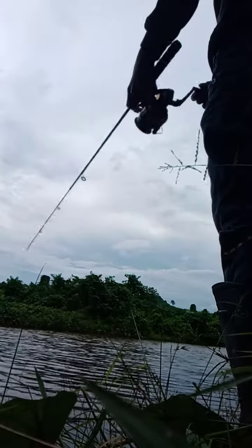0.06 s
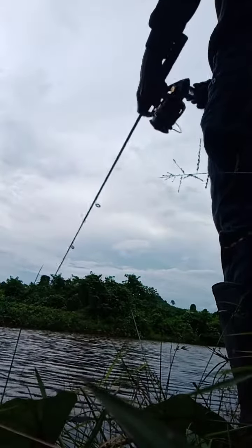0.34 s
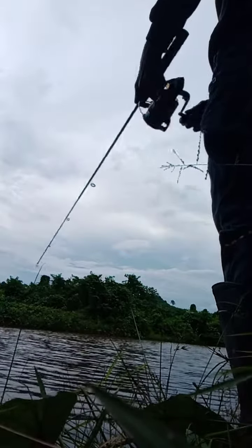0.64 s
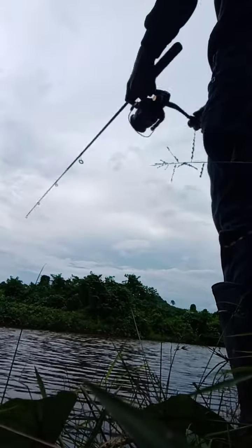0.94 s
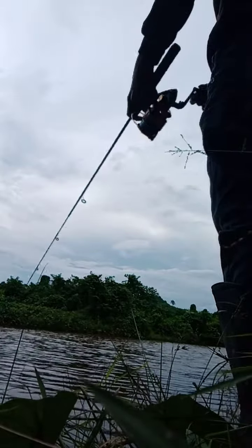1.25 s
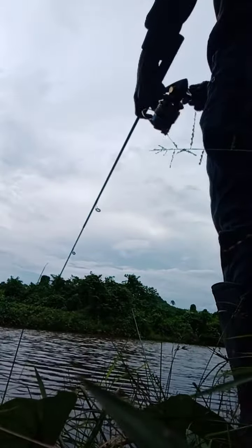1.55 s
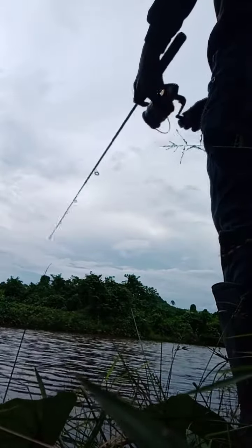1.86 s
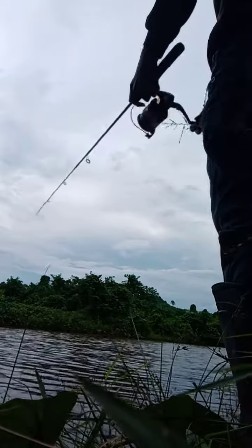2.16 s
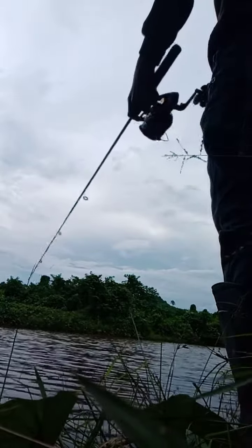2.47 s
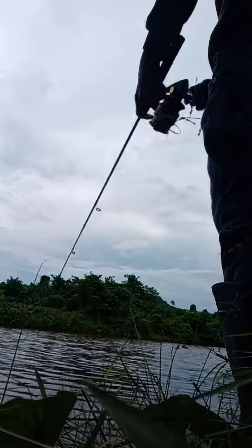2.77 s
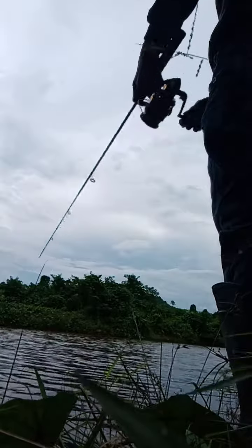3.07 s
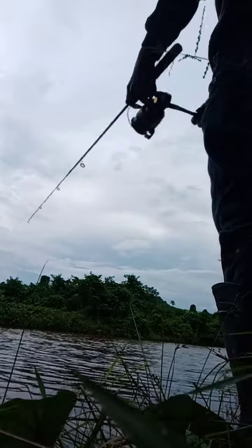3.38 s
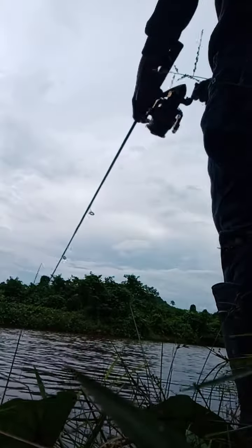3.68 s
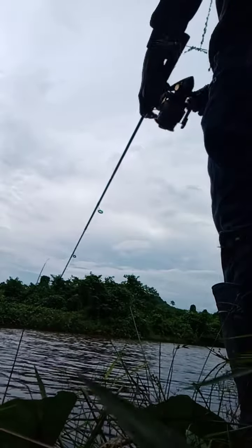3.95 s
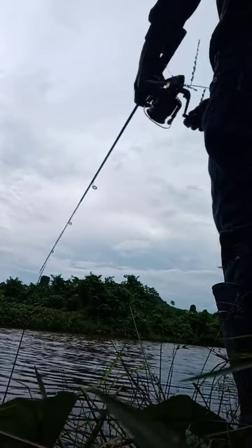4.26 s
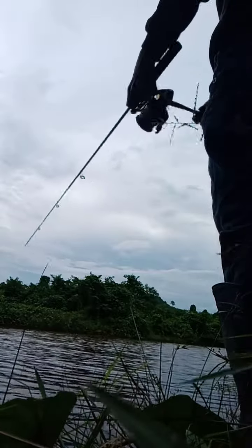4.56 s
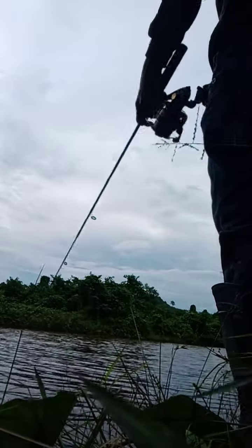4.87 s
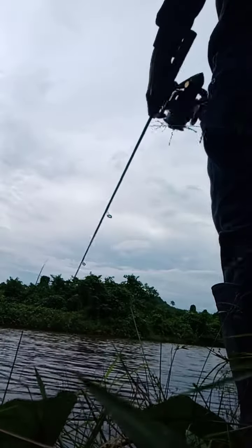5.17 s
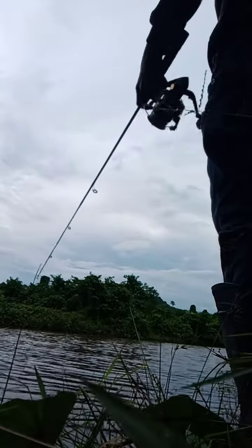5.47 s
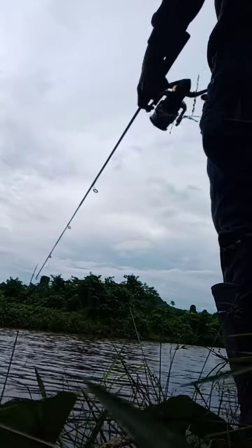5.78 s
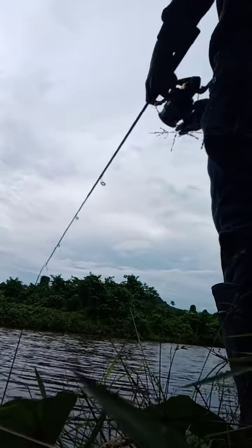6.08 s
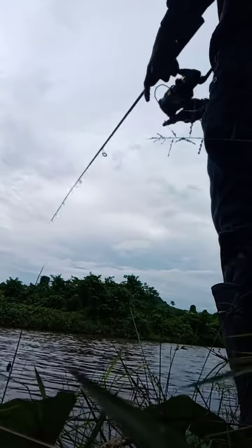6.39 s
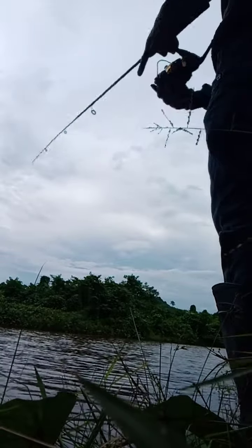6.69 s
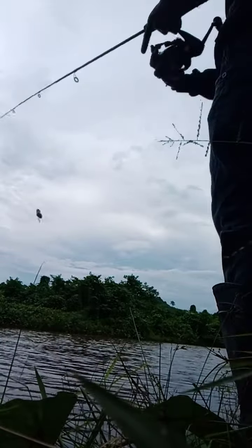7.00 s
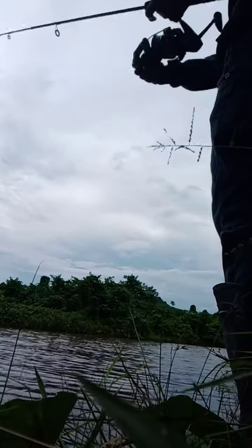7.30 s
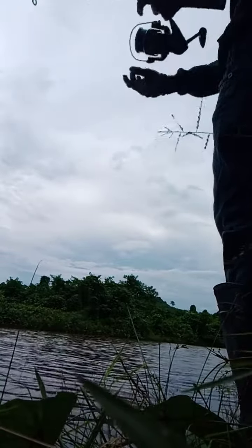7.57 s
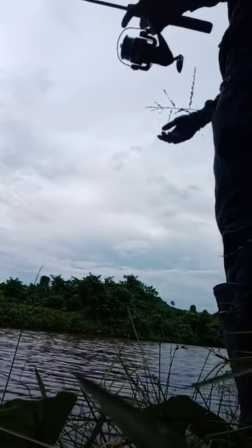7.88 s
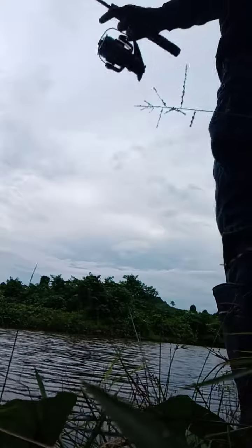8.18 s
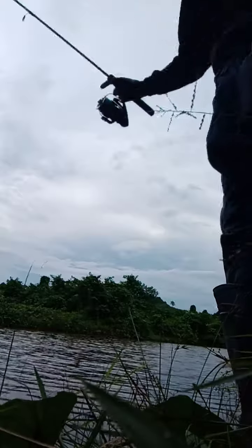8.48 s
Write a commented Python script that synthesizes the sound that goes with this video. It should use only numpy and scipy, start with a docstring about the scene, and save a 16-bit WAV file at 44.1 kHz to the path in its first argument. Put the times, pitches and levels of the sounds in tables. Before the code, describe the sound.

Crickets trill steadily by lapping water, with brief wind rumble, small fishing reel ticks, a metallic snap and a rod swishing through a cast.

```python
"""A reedy riverbank. Throughout, a close cricket trills with its wings in front of a chorus of its kind,
while ripples lap at the bank and plop into ringing bubbles. From about 1 s a spinning reel ticks and
the line rustles. Near 3 s a gust rumbles on the microphone; then a thin, higher insect swells.
At 6.8 s the reel's wire bail snaps open, and at 8.5 s the rod swishes through a cast, shedding
whistling eddies, with the line rattling off the spool."""
import sys
import numpy as np
from scipy import signal
from scipy.fft import rfft, irfft, next_fast_len
from scipy.io import wavfile
from scipy.ndimage import uniform_filter1d, map_coordinates

SR = 44100
rng = np.random.default_rng(int(sys.argv[2]) if len(sys.argv) > 2 else 0)


def file_out(sig):
    """Save sig as 16-bit WAV at sys.argv[1]."""
    # one column per channel
    cols = np.atleast_2d(sig).T
    # limit, then scale
    lim = np.clip(cols, -1, 1)
    pcm = np.round(lim * 32767).astype(np.int16)
    wavfile.write(sys.argv[1], SR, pcm)


N = 385434

# a sharp click on metal, for the bail and the rod guides: freq_hz, level_db
METAL_CLICK = [(400, -45), (3000, -22), (5000, 2.5), (6000, -2.5), (7500, 1), (10000, -9), (15000, -7)]


def amp(db):
    """Decibels to gain."""
    return 10 ** (np.asarray(db) / 20)


def unit(x):
    """Scale to rms 1."""
    return x / np.sqrt(np.mean(x ** 2) + 1e-20)


def curve(points):
    """An automation line through (time_s, value) points."""
    return np.interp(np.arange(N) / SR, *np.transpose(points))


def wobble(rate):
    """A smooth random curve, rate knots a second."""
    knots = rng.standard_normal(int(N * rate / SR) + 4)
    return map_coordinates(knots, [np.arange(N) * rate / SR])


def swell(start_s, db, rise, hold, fall):
    """An envelope that reaches db at start_s, holds and dies; rise and fall are seconds per 20 dB."""
    t = np.arange(N) / SR - start_s
    return amp(db - 20 * (np.maximum(-t, 0) / rise + np.maximum(t - hold, 0) / fall))


def fade(t60):
    """A quarter second of exponential decay."""
    return amp(-60 * np.arange(SR // 4) / SR / t60)


def ring(hz, t60, rise=0):
    """A damped sine whose pitch rises by a share as it dies."""
    t = np.arange(SR // 4) / SR
    bend = 1 + rise * np.minimum(t / t60, 1)
    return fade(t60) * np.sin(2 * np.pi * hz * np.cumsum(bend) / SR)


def noise(spectrum, size=N):
    """Noise of rms 1, coloured by (freq_hz, level_db) points of relative level per Hz."""
    m = next_fast_len(size)
    hz, db = np.transpose(spectrum)
    gain = amp(np.interp(np.log(np.fft.rfftfreq(m, 1 / SR) + 1), np.log(hz + 1), db))
    return unit(irfft(rfft(rng.standard_normal(m)) * gain, m)[:size])


def narrow(pitch, spread):
    """Noise of rms 1 in a narrow band about a moving pitch."""
    phase = 2 * np.pi * np.cumsum(pitch) / SR
    return unit(wobble(spread) * np.cos(phase) + wobble(spread) * np.sin(phase))


def patchy(x, depth_db):
    """Break a sound into random patches, each a narrow band that lasts a moment."""
    bands = signal.stft(x, nperseg=1024)[2]
    patches = uniform_filter1d(rng.standard_normal(bands.shape), 4, axis=0)
    patches = unit(uniform_filter1d(patches, 6, axis=1))
    return unit(signal.istft(bands * amp(depth_db * patches), nperseg=1024)[1][:N])


def add(track, start_s, sound):
    """Mix a sound into the track."""
    part = track[max(round(start_s * SR), 0):][:len(sound)]
    part += sound[:len(part)]


def scatter(x, t60, wet_db):
    """The reeds return a short diffuse tail."""
    tail = fade(t60) * rng.standard_normal(SR // 4)
    return x + amp(wet_db) * signal.fftconvolve(x, tail / np.linalg.norm(tail))[:N]


def air():
    """The bed: a faint wash of open river and the hiss of the reeds."""
    # open air and distant water: freq_hz, level_db
    river = [(25, -36.5), (55, -4), (90, 3.5), (160, -0.5), (260, -3), (400, -4.5), (510, -5), (620, -8.5),
             (1000, -12), (1280, -15.5), (2000, -12.5), (3200, -20.5), (4300, -28), (6000, -35.5)]
    # hissing reeds: freq_hz, level_db
    reeds = [(3300, -9.5), (3850, -2), (4350, -7), (5100, 4.5), (6000, -0.5), (9000, -18), (12300, -6),
             (15500, -3.5)]
    wash = amp(-67 + 0.766 * wobble(3.4)) * noise(river)
    hiss = amp(-71.5 + 0.76 * wobble(7.4)) * patchy(noise(reeds), depth_db=3.5)
    return wash + hiss


def wide_hiss():
    """A faint, patchy hiss spread wide in stereo."""
    # the colour of the hiss: freq_hz, level_db
    colour = [(35, -37), (60, -7.5), (539, -8), (1790, 0), (3340, -10.5), (5820, -7), (6530, -9.5),
              (9020, -25), (9900, -9.5), (11600, -20), (15000, -10.5)]
    return amp(-77) * patchy(noise(colour), depth_db=5)


def cricket(chirps, pitch_hz, glide_hz, width, octave_db):
    """Three wing strokes and a rest make a chirp; each stroke is a falling pip with a faint octave."""
    # the wing strokes, the first one weaker: level_db
    strokes = [-7.5, -2.5, -2.5]
    beat = np.floor(4 * chirps).astype(int)
    from_peak = (4 * chirps - beat - .5) / width
    stroke_db = np.array([*strokes, -120])[beat % 4]
    detune, accent = rng.standard_normal((2, 1024))[:, beat % 1024]  # every stroke differs a little
    pitch = pitch_hz + 50 * detune - glide_hz * np.tanh(from_peak / 2)
    envelope = amp(stroke_db + 1.49 * accent) * np.exp(-.5 * from_peak ** 2)
    phase = 2 * np.pi * np.cumsum(pitch) / SR
    return unit(envelope * (np.sin(phase) + amp(octave_db) * np.sin(2 * phase)))


def cricket_chorus():
    """The close cricket, three neighbours at their own tempos, and the blur of the far ones."""
    # the close cricket's tempo: time_s, chirps_per_s
    tempo = [(0, 21.0), (1, 21.12), (2.5, 20.85), (3.1, 21.0), (4, 20.75), (6.8, 20.75), (8, 20.42),
             (8.74, 20.8)]
    # its octave partial against the fundamental: time_s, level_db
    octave = [(0, -22), (1.4, -24), (2.2, -29)]
    # the blur of far insects: freq_hz, level_db
    blur = [(5900, -45), (6120, -30), (6350, -14.5), (6800, -5.5), (7150, 0.5), (7550, -2.5), (8000, -18.5),
            (8400, -21), (9400, -30.5), (10500, -38), (12800, -71.5), (14300, -30), (15200, -27),
            (15600, -41.5)]
    chirps = np.cumsum(curve(tempo)) / SR - .08
    close = cricket(chirps, pitch_hz=7353.4, glide_hz=615, width=0.1302, octave_db=curve(octave))
    close = scatter(close, t60=.08, wet_db=-4.5)
    neighbours = 0
    for hz in (6850, 7050, 7300):
        chirps = np.arange(N) / SR * rng.uniform(16, 25) + .2 * wobble(0.9956) + rng.random()
        neighbours += cricket(chirps, pitch_hz=hz, glide_hz=378, width=0.158, octave_db=-35.5)
    neighbours = unit(scatter(neighbours, t60=.15, wet_db=-1))
    far = noise(blur) * amp(0.35 * wobble(5) + 0.657 * wobble(60))
    close *= amp(-7 + 0.63 * wobble(1.526))
    return amp(-44) * (close + amp(-7) * neighbours + amp(-2.5) * far)


def plop(hz, length_s, count=9):
    """A wavelet breaks into bubbles of like size, each rising in pitch, with a soft splash."""
    # the splash: freq_hz, level_db
    splash = [(400, -12), (800, -13), (1500, -1.5), (2400, -7.5), (4000, -13), (9000, -47)]
    out = amp(-6.5) * (1 - fade(0.02)) * fade(0.14) * noise(splash, size=SR // 4)
    onsets = np.linspace(0, length_s, count) * rng.uniform(.7, 1.3, count)
    pitches = hz * np.exp(90 / hz * rng.standard_normal(count))  # spread by about 90 Hz
    attack = 1 - fade(0.00244)
    for start_s, pitch_hz in zip(onsets, pitches):
        add(out, start_s, attack * ring(pitch_hz, t60=0.0637, rise=0.061))
    return out / np.sqrt(np.sum(out ** 2) / (.015 * SR))  # the energy of 15 ms at rms 1


def water():
    """A few distinct plops and a dozen small ones over the soft gurgle of countless ripples."""
    # the loudest plops at the bank: start_s, level_db, pitch_hz, length_s
    loud = [(.240, -55.5, 2395, .015), (1.63, -59.5, 1927, .07), (2.56, -58.5, 816.6, .028),
            (2.583, -53.5, 1549, .028), (2.71, -59, 2115, .018), (3.12, -54.5, 1530, .063),
            (3.657, -54, 2732, .017), (3.66, -57.5, 1815, .055), (4.25, -59.5, 1068, .039),
            (4.614, -55.5, 835, .021), (4.618, -54, 1223, .018), (4.863, -62, 3080, .013),
            (4.925, -58.5, 2228, .032), (5.009, -54, 2412, .014), (5.125, -57.5, 1308, .023),
            (7.61, -56.5, 1291, .07)]
    # lapping ripples: freq_hz, level_db
    lapping = [(300, -20), (500, -7), (650, -9), (1000, -5.5), (1280, 0.5), (1500, -3.5), (1800, -1.5),
               (2300, -7.5), (3000, -15.5), (5000, -36)]
    small = [(rng.uniform(0, N / SR), -65 + 1.53 * rng.normal(), 1700 * np.exp(.2 * rng.normal()), .06)
             for _ in range(12)]
    plops = np.zeros(N)
    for start_s, db, hz, length_s in [*loud, *small]:
        add(plops, start_s, amp(db) * plop(hz, length_s))
    gurgle_db = -66 - 0.2172 * np.arange(N) / SR + 0.79 * wobble(3.046)  # slowly easing off
    plops = scatter(plops, t60=0.23, wet_db=-9.5)
    return plops + amp(gurgle_db) * patchy(noise(lapping), depth_db=6)


def wind(long_gust_s=.25):
    """Gusts buffet the microphone in uneven lumps; long ones swell more slowly and reach deeper."""
    # the light breeze between gusts: time_s, relative_db
    breeze = [(0, -66), (2.6, -67.5), (3.3, -52), (4.0, -59.5), (6.2, -61), (6.9, -65), (8.74, -65)]
    # gusts on the microphone: start_s, relative_db, hold_s
    gusts = [(0.01, -50, .03), (1.659, -59.5, 0.019), (2.89, -37.5, .26), (3.368, -40, 0.266),
             (3.723, -49, 0.0796), (4.071, -52, 0.0196), (4.424, -47, 0.0767), (4.591, -44, .04),
             (4.831, -50, 0.028), (4.949, -45.5, 0.0203), (5.05, -49.5, 0.0185), (6.54, -54, 0.0192)]
    # the buffeting rumble: freq_hz, level_db
    rumble = [(20, -42.5), (40, -26), (62, -1), (78, 3.5), (125, 3), (155, -4), (185, -12), (245, -39),
              (400, -55), (800, -89.5)]
    # the deep thud under long gusts: freq_hz, level_db
    thud = [(15, -13), (30, -6.5), (55, 14), (80, 6.5), (140, -47.5)]
    strength, shove = amp(curve(breeze)), 0
    for start_s, db, hold_s in gusts:
        ramp_s = .035 + .25 * hold_s
        gust = swell(start_s, db, ramp_s, hold_s, ramp_s)
        strength += gust
        shove += gust * (hold_s / long_gust_s) ** 1.58
    lumps = amp(2.54 * wobble(18) - 3)
    return strength * lumps * noise(rumble) + amp(-11) * shove * noise(thud)


def reel():
    """Small ticks and rustles while winding; then the wire bail snaps open and rings."""
    # light ticks of the reel: start_s, click_db, ring_db, ring_hz
    ticks = [(0.9764, -50, -54, 3900), (3.020, -54.5, -50, 3776), (3.111, -48, -49, 3900),
             (4.6783, -56, -70, 5500), (7.4087, -51.5, -64.5, 3500), (8.2263, -53.5, -53.5, 3650)]
    # the click of a tick: freq_hz, level_db
    tick_colour = [(300, -40), (1200, -10.5), (2600, -1.5), (3900, 8), (5500, 7), (9000, 15.5),
                   (15000, -9.5)]
    # line and sleeve rustle as the rod moves: peak_s, level_db, fall_s (per 20 dB)
    rustles = [(1.16, -66, 0.67), (3.13, -66.5, 0.16), (7.18, -63.5, 0.36)]
    # their rubbing: freq_hz, level_db
    cloth = [(1500, -13.5), (3000, -6.5), (4200, -16), (5200, 1), (6000, -6), (9500, 5.5), (12000, -15.5),
             (15500, -12.5)]
    # the bail snaps open and bounces once: start_s, level_db
    snaps = [(6.8064, -29), (6.8105, -41.5)]
    # modes of the wire bail: pitch_hz, level_db, t60_s
    bail_modes = [(1739.7, -25.5, 0.065), (2220, -25, 0.039), (3940, -21, 0.0133), (4086, -8.5, 0.031),
                  (4460, -18, 0.0157), (4511, -4, 0.026), (4640, -10, 0.0144), (6300, -10, 0.0165),
                  (9160, -6, 0.0051), (11270, -4, 0.0041), (11830, -3, 0.0061), (13760, -4.5, 0.0085)]
    rubbing = sum(swell(peak_s, db, rise=.15, hold=0, fall=fall) for peak_s, db, fall in rustles)
    out = rubbing * amp(3.64 * wobble(70)) * noise(cloth)
    for start_s, db, ring_db, ring_hz in ticks:
        click = (fade(0.0149) + amp(-9) * fade(0.067)) * noise(tick_colour, size=SR // 4)
        add(out, start_s, amp(db) * click + amp(ring_db) * ring(ring_hz, t60=0.026))
    wire = sum(amp(db) * ring(hz, t60) for hz, db, t60 in bail_modes)
    contact = 1 - fade(.003)  # the contact builds up briefly, so the snap has no bass
    for start_s, db in snaps:
        crack = amp(-2.5) * fade(0.0036) * noise(METAL_CLICK, size=SR // 4)
        add(out, start_s, amp(db) * contact * (wire + crack))
    return scatter(out, t60=0.145, wet_db=-4)


def high_insect(pitch_hz=9480, throb_hz=8.3, depth_db=3.5):
    """A thin buzz above the crickets throbs several times a second."""
    # the buzz swells, rests briefly and resumes: time_s, level_db
    fader = [(0, -82), (2.6, -82.5), (5.5, -68), (6.1, -70.5), (6.3, -89), (7.4, -75), (8.74, -70.5)]
    throb = np.sin(2 * np.pi * throb_hz * np.arange(N) / SR + 2.7 * wobble(2.9))
    level = amp(curve(fader) + depth_db * throb + 1.92 * wobble(9))
    return level * narrow(pitch_hz + 130 * wobble(200) + 60 * wobble(6), spread=650)


def cast(start_s=8.531, swing_s=.072, whistle_hz=545, octaves_per_s=20):
    """The rod sheds eddies, rising in pitch with its speed; the line hisses out and slaps the guides."""
    # envelopes of whistle, rush and line: delay_s, level_db, rise_s, hold_s, fall_s (ramps per 20 dB)
    whistle_shape = (.004, -35, .013, .045, .035)
    rush_shape = (.048, -39.5, .05, .012, .16)
    line_shape = (.034, -41, .04, .04, 0.28)
    # the rush of torn air: freq_hz, level_db
    torn_air = [(280, -49.5), (380, -20.5), (500, -4.5), (750, -2), (1400, -2), (2400, -9), (3500, -15.5),
                (6000, -18.5)]
    # line leaving the spool: freq_hz, level_db
    spool_hiss = [(2500, -28.5), (4200, -12), (5300, 2.5), (7500, 3), (10500, -6), (14000, -7),
                  (15500, -15.5)]
    # the line slaps the rod guides: start_s, click_db, knock_hz, knock_db
    slaps = [(8.598, -36.5, 900, -58), (8.6255, -33.5, 807, -37), (8.636, -45.5, 1250, -40),
             (8.656, -34.5, 900, -51.5), (8.697, -36, 1370, -51.5), (8.705, -36.5, 1342, -46),
             (8.71, -35.5, 1350, -38.5), (8.721, -38.5, 838, -50.5), (8.731, -36.5, 800, -49.5)]
    whistle, rush, line = [swell(start_s + delay_s, *shape)
                           for delay_s, *shape in (whistle_shape, rush_shape, line_shape)]
    swung_s = np.clip(np.arange(N) / SR - start_s, 0, swing_s)
    pitch = whistle_hz * 2 ** (octaves_per_s * swung_s)
    tip = np.sin(2 * np.pi * np.cumsum(pitch * (1 + 0.07 * wobble(300))) / SR)
    shaft = narrow(pitch, spread=330)
    smear = swung_s / swing_s  # the tapering shaft smears the whistle into a band as it speeds up
    out = 1.2 * whistle * ((1 - smear) * tip + smear * shaft)
    out += rush * noise(torn_air)
    out += line * amp(1.43 * wobble(250)) * noise(spool_hiss)
    for slap_s, db, knock_hz, knock_db in slaps:
        click = amp(db) * fade(0.0151) * noise(METAL_CLICK, size=SR // 4)
        add(out, slap_s, click + amp(knock_db) * ring(knock_hz, t60=0.0467))
    return out


def scene():
    """Nearly everything sits in the centre; only a little hiss, rumble and tackle noise is wide."""
    mid = cricket_chorus() + high_insect() + water() + reel() + cast() + wind() + air()
    side = wide_hiss() + amp(-31) * wind() + amp(-30) * (reel() + cast())
    return np.array([mid + side, mid - side])


def record(dry):
    """A brick-wall high cut at 15550 Hz."""
    m = next_fast_len(N + SR // 2)
    passband = np.fft.rfftfreq(m, 1 / SR) < 15550
    return irfft(rfft(dry, m) * passband, m)[:, :N]


dry = scene()
out = record(dry)
file_out(out)
```